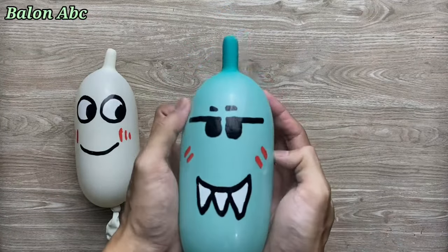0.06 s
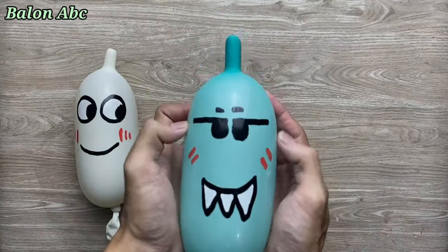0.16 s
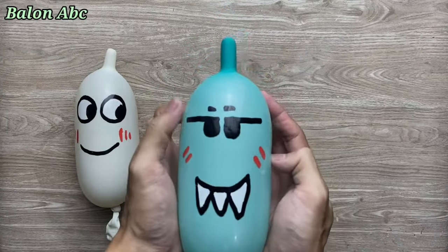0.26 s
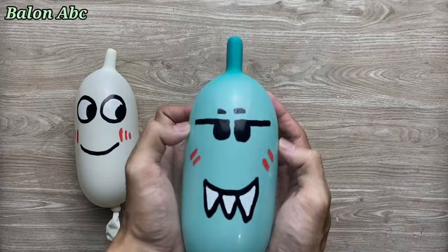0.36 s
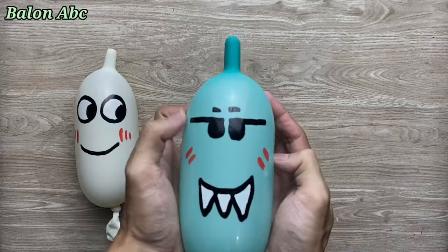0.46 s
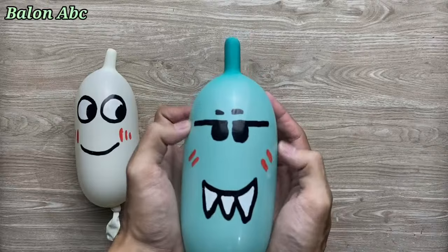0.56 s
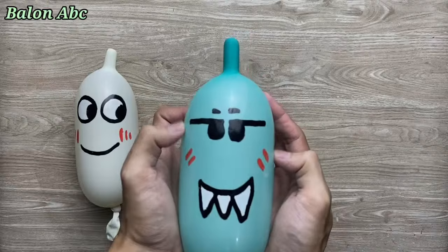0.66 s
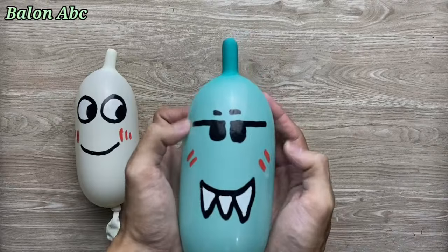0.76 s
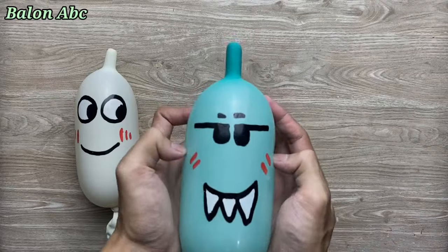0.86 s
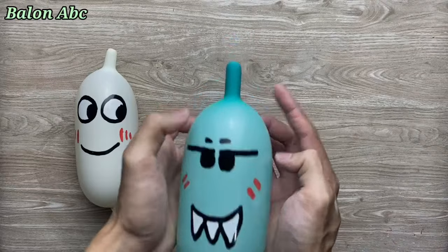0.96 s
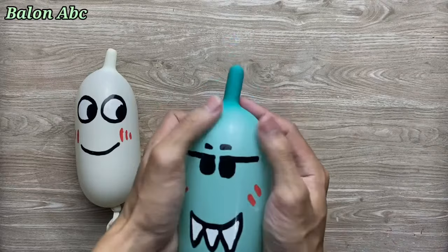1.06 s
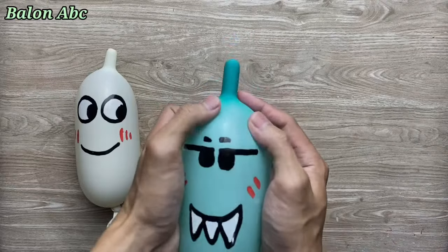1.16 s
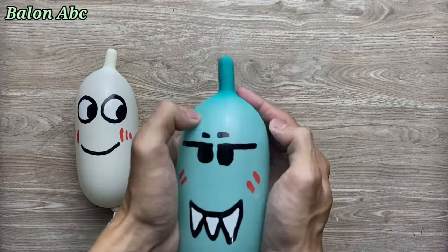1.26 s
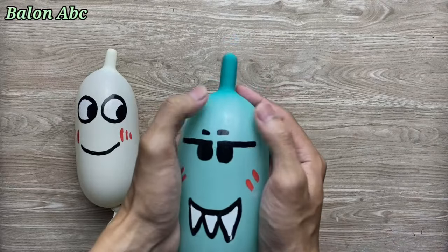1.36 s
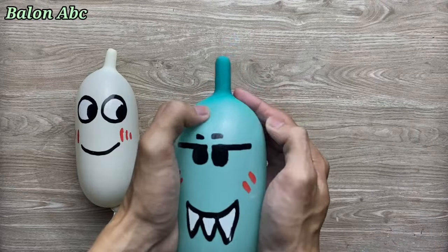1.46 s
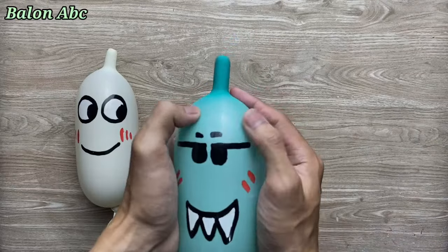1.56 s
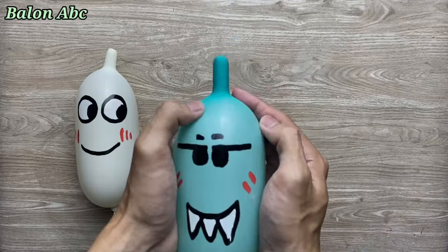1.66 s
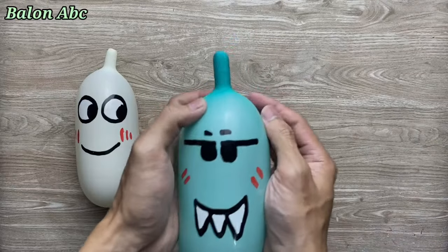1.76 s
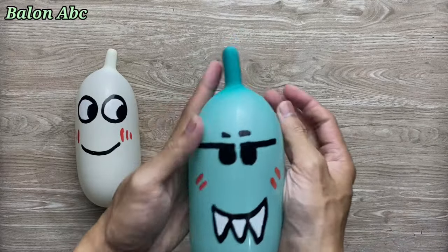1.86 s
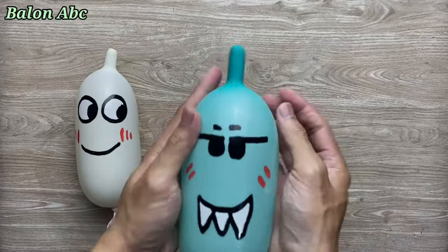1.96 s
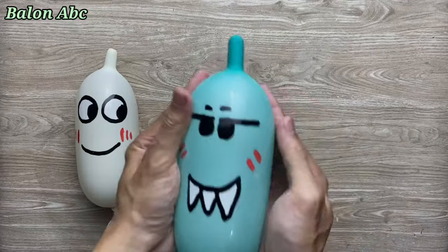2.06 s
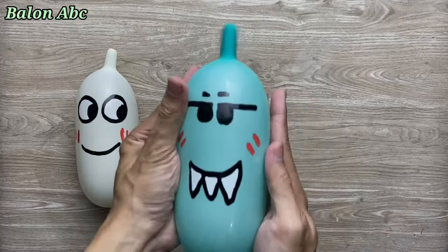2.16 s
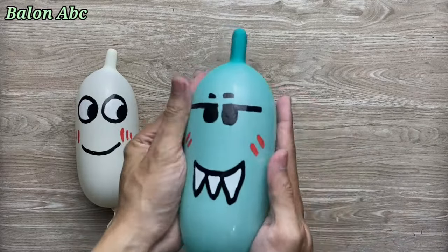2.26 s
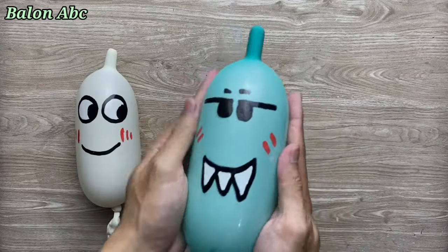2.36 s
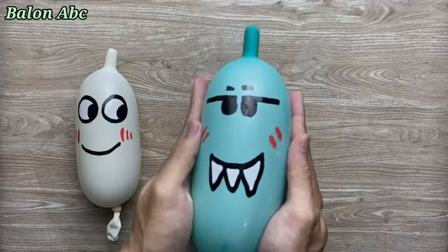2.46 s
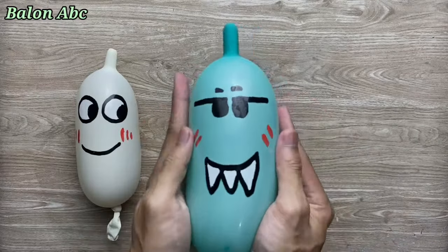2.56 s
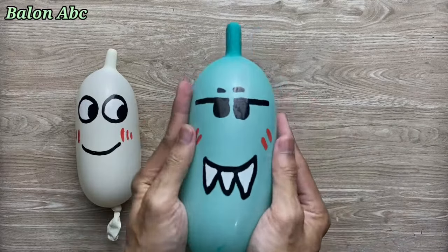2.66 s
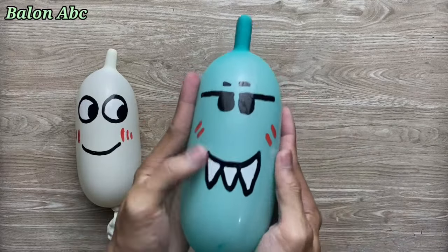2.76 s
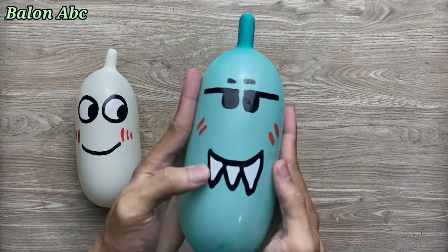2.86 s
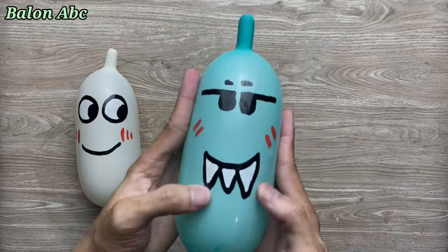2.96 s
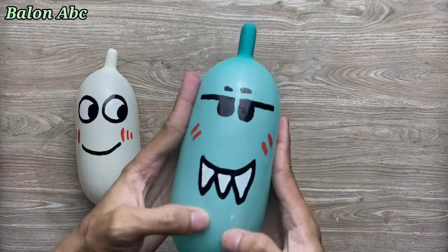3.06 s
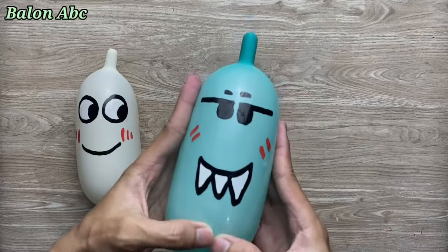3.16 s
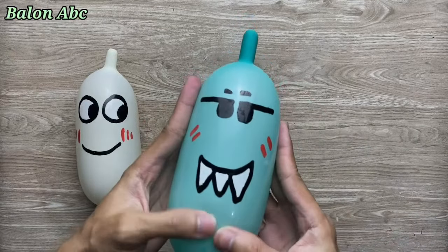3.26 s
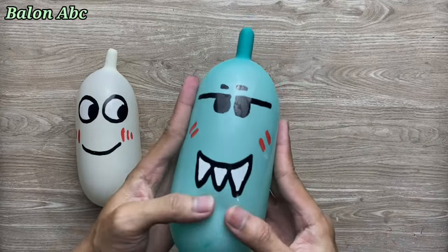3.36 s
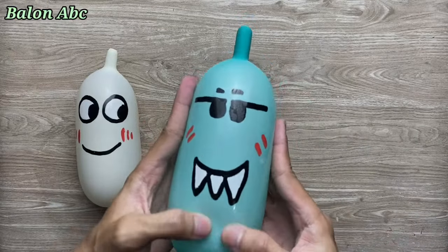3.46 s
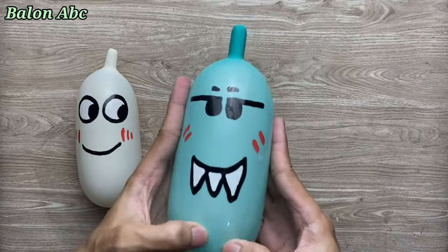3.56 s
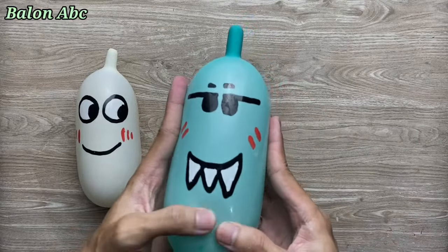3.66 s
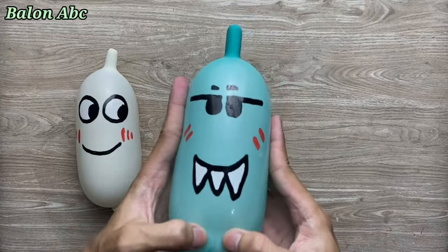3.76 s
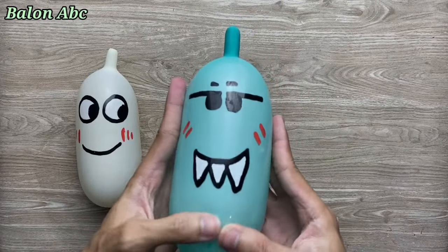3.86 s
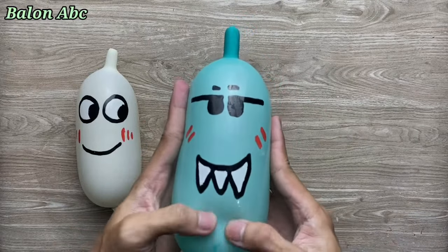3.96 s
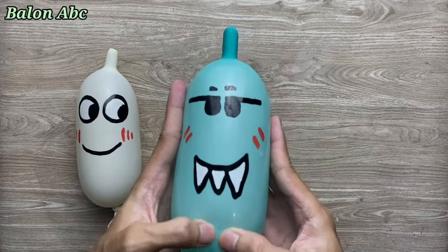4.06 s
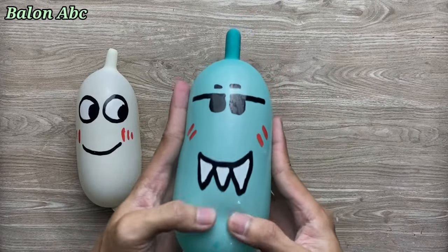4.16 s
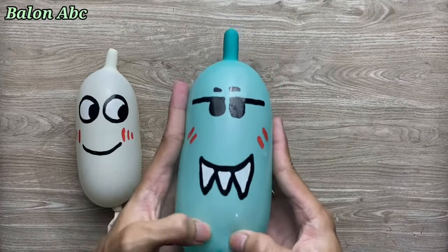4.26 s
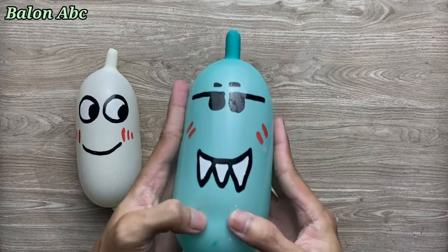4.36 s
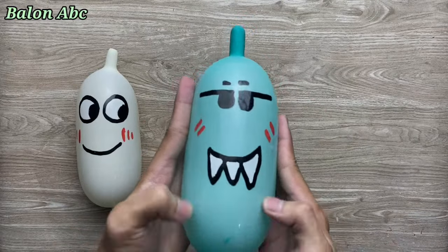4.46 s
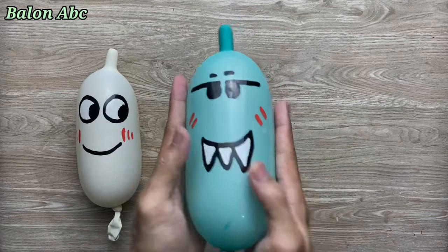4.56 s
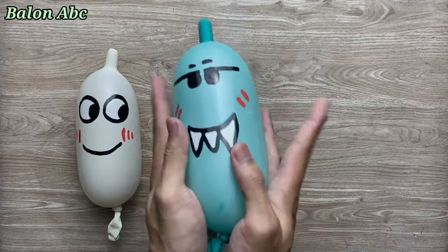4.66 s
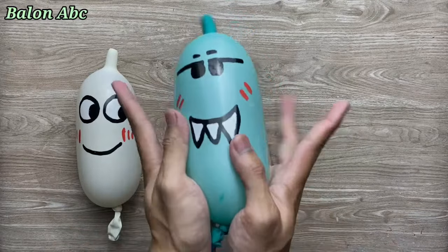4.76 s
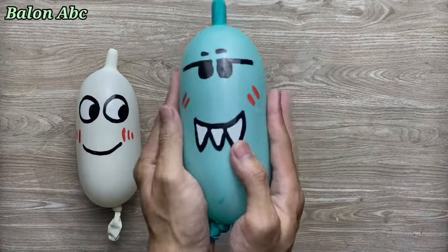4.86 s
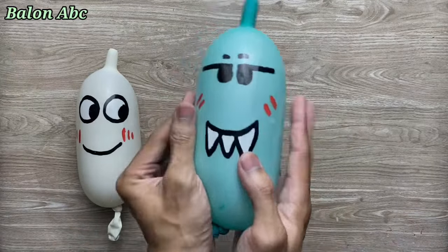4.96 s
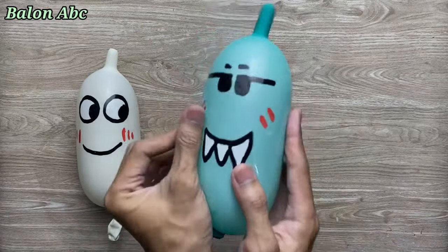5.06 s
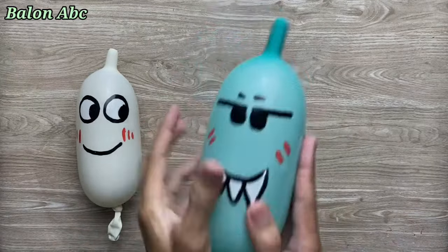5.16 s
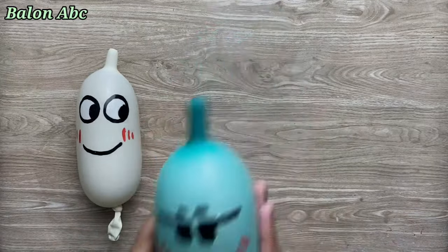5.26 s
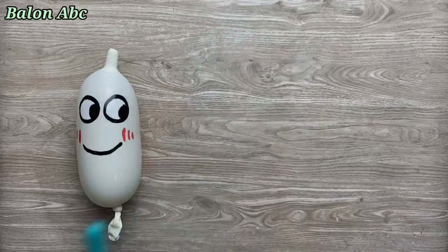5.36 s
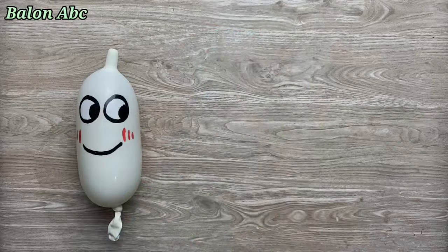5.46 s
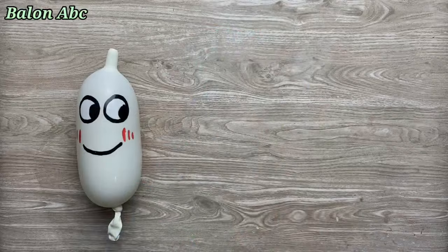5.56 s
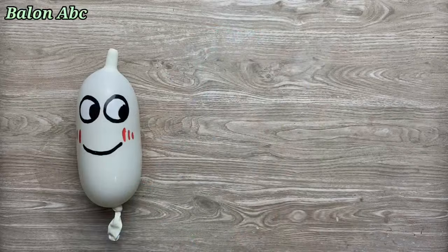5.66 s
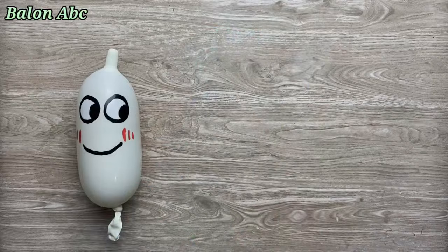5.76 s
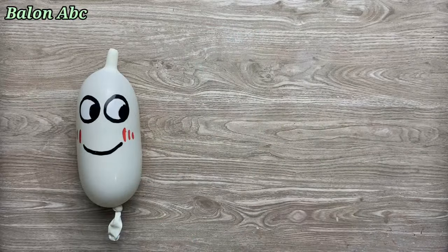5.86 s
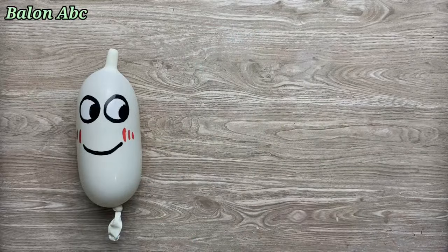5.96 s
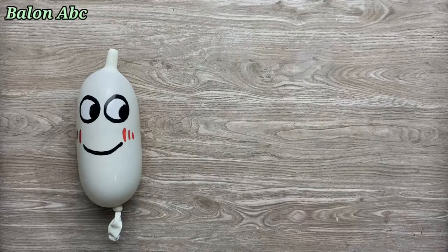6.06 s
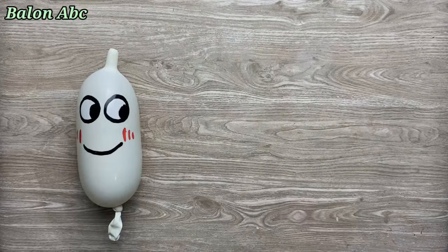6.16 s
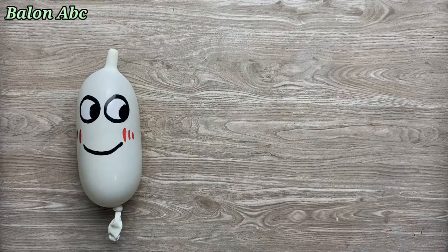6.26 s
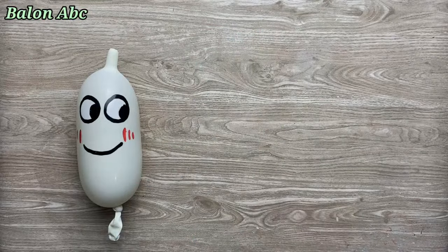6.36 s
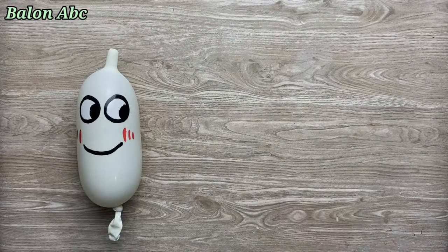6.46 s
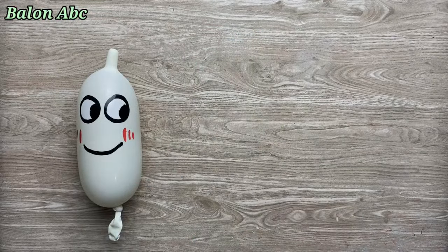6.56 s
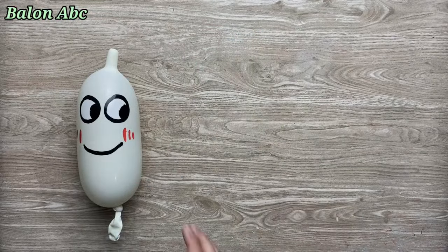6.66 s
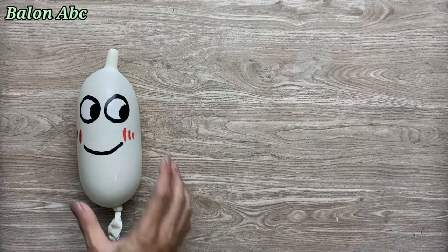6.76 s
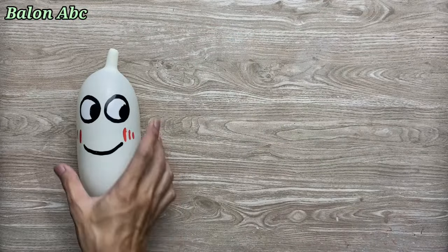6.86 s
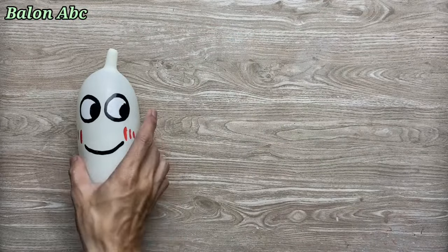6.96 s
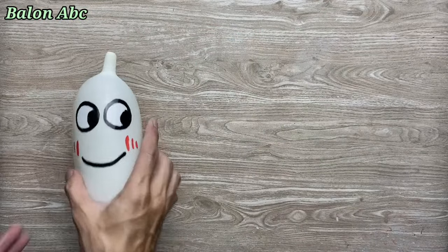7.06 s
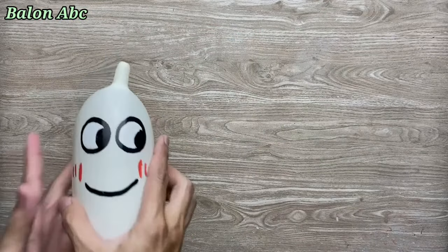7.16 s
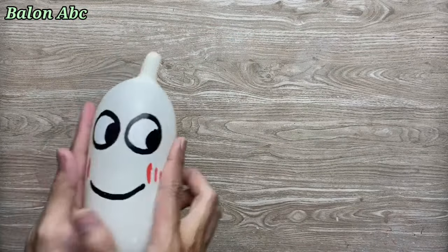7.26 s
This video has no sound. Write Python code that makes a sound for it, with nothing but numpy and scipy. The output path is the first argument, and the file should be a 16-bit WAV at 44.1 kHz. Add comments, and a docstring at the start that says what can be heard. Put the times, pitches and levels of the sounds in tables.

```python
"""A low machine hum fills a small room; at once two hands rub and squeeze a filled latex balloon up close.
Skin sticks and slips on the rubber: uneven slips creak in the balloon's modes, regular ones glide as squeaks.
Snaps, short pings and the grainy hiss of dry skin join in. Then faint rustles and soft thuds on a wooden
table follow as the balloon is put aside and another is picked up.
Creaks are noisy pulse trains through resonators, squeaks gliding harmonics, the rest shaped noise and tones."""
import sys
import numpy as np
from scipy import signal
from scipy.fft import rfft, irfft, next_fast_len
from scipy.io import wavfile
from scipy.ndimage import uniform_filter1d, map_coordinates

SR = 44100
rng = np.random.default_rng(int(sys.argv[2]) if len(sys.argv) > 2 else 0)


def wav_out(sig):
    """Save sig, one row per channel (or a flat mono array), as 16-bit PCM at SR to the path in sys.argv[1]."""
    wavfile.write(sys.argv[1], SR, np.round(np.clip(np.atleast_2d(sig).T, -1, 1) * 32767).astype(np.int16))


N = 322812


def amp(db):
    """Decibels to a linear gain."""
    return 10 ** (np.asarray(db) / 20)


def unit(x):
    """x scaled to rms 1."""
    return x / np.sqrt(np.mean(x ** 2) + 1e-20)


def steady(x, seconds):
    """x levelled towards rms 1 over a sliding window, with its faintest stretches left quiet."""
    window = np.hanning(max(int(seconds * SR), 9))
    power = np.abs(signal.fftconvolve(x ** 2, window / window.sum(), "same"))
    return x / np.sqrt(power + 0.029 * np.mean(x ** 2))


def along(points, hz):
    """Value at hz from (Hz, value) points joined on a log frequency axis."""
    point_hz, values = np.transpose(points)
    return np.interp(np.log(hz + 1), np.log(point_hz + 1), values)


def curves(rows):
    """One value per sample for each column after the time."""
    seconds, *columns = np.transpose(rows)
    return [np.interp(np.arange(N) / SR, seconds, column) for column in columns]


def wobble(rate, size=N):
    """A smooth random curve with rate knots a second."""
    knots = rng.standard_normal(int(size * rate / SR) + 4)
    return map_coordinates(knots, [np.arange(size) * rate / SR])


def filtered(x, response):
    """x shaped by a response that is a function of frequency."""
    padded = next_fast_len(N + 8192)
    spectrum = rfft(x, padded) * response(np.fft.rfftfreq(padded, 1 / SR))
    return irfft(spectrum, padded)[..., :N]


def ring(x, hz, width_hz):
    """One damped resonance with a peak gain of 1."""
    return signal.lfilter(*signal.iirpeak(hz, hz / width_hz, SR), x)


def softened(x, corner_hz):
    """A soft fingertip rounds each release: a gentle low-pass."""
    return signal.sosfilt(signal.butter(2, min(corner_hz, SR / 3), fs=SR, output="sos"), x)


def bursts(events, t60):
    """A short dying puff of noise at each (s, dB)."""
    out, t = np.zeros(N + SR), np.arange(SR // 4) / SR
    for start, db in events:
        out[round(start * SR):][:len(t)] += amp(db - 60 * t / t60) * rng.standard_normal(len(t))
    return out[:N]


# The low hum. Each row: frequency in Hz, mean level in dB.
HUM_TONES = [(48.4, -51), (80.7, -58)]
# A machine's gliding tone. Each row: time in seconds, frequency in Hz, level in dB.
MACHINE_DRONE = [(0, 199.5, -50), (5.2, 203.5, -59), (6, 202.6, -61), (6.3, 197, -51.5),
                 (6.6, 197.8, -48.5), (7.32, 202.3, -55.5)]
# Colour of the room's rumble. Each row: frequency in Hz, relative density in dB per Hz.
RUMBLE_COLOUR = [(25, -35), (45, -3.5), (70, 3), (100, -1.5), (150, -12.5), (300, -19.5), (700, -31.5),
                 (1300, -39.5), (3000, -49), (6000, -65.5), (15000, -64)]


def background():
    """Machine tones over a noise rumble that is nearly mono in the bass."""
    t = np.arange(N) / SR
    hum = np.zeros(N)
    for hz, db in HUM_TONES:
        level = amp(db + wobble(4.1)) * np.sqrt(2)
        hum += level * np.sin(2 * np.pi * hz * t + 1.43 * wobble(2.5))
    drone_hz, drone_db = curves(MACHINE_DRONE)
    drone = amp(drone_db) * np.sqrt(2) * np.sin(2 * np.pi * np.cumsum(drone_hz) / SR)
    mid, side = filtered(rng.standard_normal((2, N)), lambda hz: amp(along(RUMBLE_COLOUR, hz)))
    side = filtered(side, lambda hz: amp(along([(60, -21), (400, -2.0), (2000, -0.5)], hz)))
    rumble = amp(-44) * unit(np.array([mid + side, mid - side]))
    return (hum + drone + rumble) * amp([[-.9], [.9]])  # a touch stronger on the right


LINGER_DB, LINGER_DB_PER_S = -11.5, 107.5  # loose contact that outlasts a stroke


def stroke(start, length, swell_db, attack_s, release_db_per_s):
    """Gain of one stroke: attack, a hold that swells or sags, a release with a lingering tail."""
    gain = np.zeros(N + 2 * SR)
    t = np.arange(int((length + .5) * SR)) / SR
    after = np.maximum(t - length, 0)
    hold = amp(swell_db * (np.minimum(t / length, 1) - .5))
    release = np.maximum(amp(-release_db_per_s * after), amp(LINGER_DB - LINGER_DB_PER_S * after))
    gain[max(round(start * SR), 0):][:len(t)] = np.minimum(t / attack_s, 1) * hold * release
    return gain[:N]


# A finger grips and drags over the rubber. Each row: start in seconds, length in seconds, creak level in dB,
# rasp level in dB, swell from start to end in dB.
FINGER_RUBS = [ (0.016, 0.061, -29, -44, 4.5), (0.118, 0.079, -30, -48.5, -11),
               (0.243, 0.048, -27.5, -39, -4), (0.323, 0.09, -30, -49, -1.5), (0.474, 0.026, -35, -40.5, 2),
               (0.554, 0.1, -30, -48.5, -3.5), (0.764, 0.074, -27, -48.5, 8.5),
               (0.841, 0.037, -21.5, -40, -12.5), (0.908, 0.13, -43.5, -71.5, 2),
               (1.201, 0.07, -34, -55.5, 7), (1.458, 0.014, -28.5, -49, -6.5),
               (1.517, 0.011, -41.5, -57.5, -1.5), (1.637, 0.039, -32, -52, 3.5),
               (1.742, 0.15, -41.5, -57, 7.5), (1.968, 0.17, -32.5, -54, -0.5),
               (2.159, 0.048, -32, -42, -1.5), (2.221, 0.069, -33.5, -52.5, -1),
               (2.364, 0.086, -29.5, -48, 3.5), (2.505, 0.06, -34, -50.5, 7),
               (2.57, 0.085, -27.5, -43.5, -6.5), (2.719, 0.082, -27.5, -39.5, -1),
               (2.79, 0.1, -28, -47, 5), (2.86, 0.084, -30.5, -42.5, 0.5), (2.95, 0.22, -33, -45, -6),
               (3.278, 0.085, -34, -51.5, 6), (3.413, 0.0049, -39.5, -49, -12.5),
               (3.473, 0.056, -24.5, -44, -9), (3.563, 0.058, -40.5, -55.5, 10),
               (3.673, 0.056, -26, -45, 5), (3.835, 0.051, -27.5, -46.5, 0.5),
               (3.973, 0.062, -29, -46.5, -3.5), (4.102, 0.053, -37, -47.5, -6),
               (4.184, 0.037, -24, -39.5, -3), (4.344, 0.038, -34.5, -50, 6.5),
               (4.39, 0.024, -25.5, -42.5, -3), (4.448, 0.02, -28.5, -37.5, -15.5),
               (4.48, 0.13, -49, -66, 5), (4.679, 0.02, -43, -48.5, -22), (4.763, 0.037, -24.5, -44.5, 1),
               (4.843, 0.0078, -21.5, -45.5, -1), (4.88, 0.13, -22.5, -48.5, -5),
               (5.031, 0.032, -26, -40, -11), (5.072, 0.024, -30.5, -50, -6),
               (5.217, 0.029, -32, -51.5, -3.5)]
ATTACK_S, RELEASE_DB_PER_S = 0.0069, 658  # a firm finger takes hold, and lets go
FIRM_DB, EASE_DB_PER_DOUBLING = -17.5, 3.5  # a creak this much below firm takes twice as long to take hold


def pressure():
    """Gains of creak and rasp; light rubs ease in, up to four times slower, and overlaps add in power."""
    creak, rasp = np.zeros(N), np.zeros(N)
    for start, length, creak_db, rasp_db, swell_db in FINGER_RUBS:
        attack_s = ATTACK_S * 2 ** np.clip((FIRM_DB - creak_db) / EASE_DB_PER_DOUBLING, 0, 2)
        early = (attack_s - ATTACK_S) / 2  # a slow attack starts ahead of time
        power = stroke(start - early, length + early, swell_db, attack_s, RELEASE_DB_PER_S) ** 2
        creak += amp(creak_db) ** 2 * power
        rasp += amp(rasp_db) ** 2 * power
    return np.sqrt(creak), np.sqrt(rasp)


def slips(rate, drift, scatter, spread_db):
    """Sample positions and sizes of stick-slip releases, whose rate glides with the finger's speed."""
    cycles = np.cumsum(rate * np.exp(drift * wobble(28))) / SR
    marks = np.cumsum(np.exp(scatter * rng.standard_normal(int(cycles[-1]) * 2)))
    when = np.searchsorted(cycles, marks[marks < cycles[-1]])
    return when, amp(spread_db * rng.standard_normal(len(when)))


def struck(when, size, modes, variety, wander_db=0):
    """Each slip drives the modes in new shares, and the shares drift as the contact wanders."""
    shares = 1 + variety * rng.standard_normal((len(modes), len(when)))
    shares = shares * amp(wander_db * np.array([wobble(16)[when] for _ in modes]))
    out = np.zeros(N)
    for k, (hz, width_hz, db) in enumerate(modes):
        pulses = np.bincount(when, size * shares[k], N)
        out += (-1) ** k * amp(db) * ring(pulses, hz, width_hz)  # neighbours in opposite polarity
    return out


BEND_PERCENT, BEND_PER_S = 6, 22  # how far and how often the fingers' pull bends the body modes


def stretched(x, percent):
    """Stretching the rubber bends its ringing up and down in pitch."""
    rate = percent / 100 * wobble(BEND_PER_S)
    ahead = np.cumsum(rate - uniform_filter1d(rate, SR // 5))
    return map_coordinates(x, [np.arange(N) + ahead])


# Skin on latex. Each row: frequency in Hz, gain in dB.
SKIN_COLOUR = [(500, -24.5), (1200, 8.5), (2500, 3.5), (4000, 1), (6000, -7), (10000, -13), (15000, -28.5)]


def skin(x):
    """The bright colour of skin on latex."""
    return filtered(x, lambda hz: amp(along(SKIN_COLOUR, hz)))


# How fast the fingers travel. Each row: time in seconds, stick-slip releases per second before random drift.
SLIP_RATES = [(0, 230), (.25, 260), (.35, 100), (.62, 135), (.85, 270), (2.4, 230), (2.52, 125),
              (2.75, 330), (3.15, 300), (3.7, 210), (4.2, 270), (4.9, 230)]
# The balloon, six body modes and then three upper ones. Each row: frequency in Hz, width in Hz,
# relative level in dB.
BALLOON_MODES = [(355.6, 33, -1), (441, 78, -6), (595, 66, -5.5), (721.4, 66, 3.5), (774.4, 80, 6),
                 (880, 43, 1), (1056, 140, -8), (1057, 250, -10.5), (1533.6, 45, -7.5)]
# The whole wall giving way. Each row: frequency in Hz, width in Hz, relative level in dB.
WALL_MODES = [(182, 83, 0.5), (240, 140, -4.5)]
# Modes rung by the rasp. Each row: frequency in Hz, width in Hz, relative level in dB before it wanders.
SINGING_MODES = [(2080, 280, -2.5), (2615, 71, 9), (3192, 27, 14.5), (3334, 440, -15)]
# The grip. Each row: time in seconds, wall flexing in dB relative to the creak, tautness as dB on the
# balloon's upper modes, dB on the singing modes.
GRIP_CURVE = [(0, -10, 3.5, -1), (.9, -15, 3, -2), (1.25, -4.5, 7, 0), (1.55, -3.5, 9.5, -1.5),
              (1.9, -15, 3.5, 0.5), (2.1, -3.5, 2, 0), (2.45, -9, 3, -4.5), (2.8, -19, -3.5, 1),
              (3.05, -10.5, 7, 0.5), (3.3, -9.5, 3, -1), (3.7, -11, 1.5, -1.5), (4.25, -9.5, 5.5, -2),
              (4.8, -12, 0, 2), (5, -20, -17.5, -2), (5.3, -6.5, -0.5, 3)]


def rubbing():
    """Slips ring the balloon and flex its wall; each also lets go a rasping puff."""
    creak_gain, rasp_gain = pressure()
    flex_db, taut_db, sing_db = curves(GRIP_CURVE)
    when, size = slips(rate=curves(SLIP_RATES)[0], drift=.25, scatter=.2, spread_db=2.4)

    body = struck(when, size, BALLOON_MODES[:6], variety=0.45, wander_db=3)
    upper = struck(when, size, BALLOON_MODES[6:], variety=0.33)
    body = softened(stretched(body, BEND_PERCENT), corner_hz=1350)
    creak = steady(softened(body + amp(taut_db) * upper, corner_hz=2070), seconds=.025)
    flex = softened(struck(when, size, WALL_MODES, variety=0.68), corner_hz=433)
    flex = steady(flex, seconds=0.26)

    # each release puffs noise that dies in 3.7 ms; the power below 1 evens out firm and light ones
    puff_decay = np.exp(-1 / (0.0037 * SR))
    puffs = signal.lfilter([1], [1, -puff_decay], np.bincount(when, size ** 0.62, N))
    grit = (unit(puffs) + 0.35) * rng.standard_normal(N)
    # the high modes come and go as the contact wanders, and sing mainly under a firm grip
    singing = np.zeros(N)
    for hz, width_hz, db in SINGING_MODES:
        singing += amp(db + 6.7 * wobble(12)) * ring(grit, hz, width_hz)
    singing = unit(softened(singing, corner_hz=5440))
    firmness = amp(sing_db) * (rasp_gain / amp(-39.5)) ** 0.36
    rasp = steady(unit(skin(grit)) + firmness * singing, seconds=0.078)

    judder = amp(2.49 * wobble(70))  # the finger drags unevenly
    return judder * (creak_gain * (creak + amp(flex_db) * flex) + rasp_gain * rasp)


# Skin tearing loose with a snap. Each row: time in seconds, push on the balloon's modes in dB,
# crack level in dB before the skin's colour.
SKIN_SNAPS = [(.017, 14.5, -56), (0.022, 18.5, -47), (.123, 10, -29), (.344, 9, -31), (.360, 13.5, -50),
              (0.386, 16, -45.5), (.409, 7, -53), (.585, 18, -52), (.611, 10, -54), (.622, 16.5, -46.5),
              (.630, 14.5, -50), (1.470, 11.5, -50), (1.521, 6, -45), (1.671, 17.5, -33.5),
              (1.956, -17, -35), (2.502, 18, -44), (2.521, 10.5, -52), (2.536, 13, -42), (2.545, 16, -44),
              (2.554, 15, -42), (2.583, 15, -32), (2.643, 10, -50), (3.405, 11, -34.5), (3.685, 15.5, -40),
              (3.712, 13, -36), (3.967, 16, -29), (4.023, 6, -34), (4.311, 9.5, -38.5), (4.445, 7, -29.5),
              (4.460, 15.5, -32), (4.683, 0.5, -40), (4.763, 14, -36), (4.797, 19.5, -22.5),
              (5.051, 18.5, -25.5), (7.214, -2.5, -44)]


def snaps():
    """Each snap rings the balloon's modes and cracks with a short burst of noise."""
    seconds, push_db, crack_db = np.transpose(SKIN_SNAPS)
    when = (seconds * SR).astype(int)
    body = softened(struck(when, amp(push_db), BALLOON_MODES, variety=0.35), corner_hz=2190)
    return body + skin(bursts(zip(seconds, crack_db), t60=0.013))


# Regular slipping. Each row: start in seconds, length in seconds, start, middle and end pitch in Hz,
# tone level in dB before softening and mix, roughness (held to 0-1).
SQUEAK_GLIDES = [ (0.028, 0.035, 380, 750, 1300, -28.5, 0.65), (0.243, 0.014, 333, 500, 950, -25, 0.4),
                 (0.251, 0.029, 1200, 1700, 800, -28.5, .3), (0.448, 0.025, 1620, 1860, 2280, -32, 0.12),
                 (0.468, 0.025, 2230, 1820, 850, -33, 0.35), (.656, 0.028, 1000, 1450, 1650, -32, 0.38),
                 (0.677, 0.01, 1574, 1570, 1650, -24.5, 0), (0.684, 0.02, 1760, 1420, 750, -32.5, .42),
                 (0.849, 0.019, 688, 801, 778, -16, 0.14), (1.26, 0.02, 322, 174.5, 139.6, -24.5, 0.4),
                 (1.467, 0.018, 266, 183, 146.6, -26.5, 0.47), (1.472, 0.013, 1650, 1510, 1460, -41.5, 0.1),
                 (1.529, 0.019, 281.4, 200, 159, -28, 0.01), (1.676, 0.018, 1580, 1468, 1510, -34.5, 0),
                 (1.698, 0.028, 750, 770, 790, -35, 0.3), (1.868, 0.029, 1494, 1000, 248, -41, 0.6),
                 (2.16, 0.025, 720, 854, 900, -28, 0.55), (2.236, 0.06, 600, 680, 1000, -33, 0.85),
                 (2.366, .042, 854, 619, 460, -29, .35), (2.743, 0.051, 400, 765, 857, -28, 0.55),
                 (2.872, 0.065, 830, 740, 400, -29.5, 0.5), (3.473, 0.026, 795, 739, 758, -22.5, 0),
                 (3.515, 0.04, 711, 379.6, 187, -31, 0.45), (3.968, 0.025, 883, 801, 731, -22, 0.43),
                 (4.181, 0.045, 866, 792, 503, -26, 0.63), (4.226, 0.03, 436, 308, 219, -27, 0.55),
                 (4.397, 0.028, 400, 700, 1600, -28.5, 0.9), (4.446, 0.0092, 767, 794, 804, -22.5, 0.2),
                 (4.452, 0.019, 1135, 1574, 1720, -32.5, 0.5), (5.125, 0.018, 746, 1384, 2300, -35.5, 1.1)]
# Smooth squeaks. Each row: pitch in Hz, step from each overtone to the next in dB.
OVERTONE_STEPS = [(800, -17), (1500, -11)]
BITE_DB = 6  # rough squeaks release more sharply: at full roughness each overtone step falls this much less
GRIT_DB, BREAK_UP = -14, .6  # rasp of a fully rough squeak; growth of roughness from its middle to its end


def squeaks():
    """Under even pressure slips lock into a pitch that follows the finger's speed; rough ones turn raspy."""
    tones, grit = np.zeros(N + SR), np.zeros(N + SR)
    for start, length, start_hz, middle_hz, end_hz, db, rough in SQUEAK_GLIDES:
        u = np.linspace(0, 1, max(int(length * SR), 64))
        size = len(u)
        rough = np.clip(rough, 0, 1)
        loose = rough * (1 + BREAK_UP * (2 * u - 1))
        # a parabola in log pitch through the three pitches
        glide = np.polyfit([0, .5, 1], np.log([start_hz, middle_hz, end_hz]), 2)
        pitch = np.exp(np.polyval(glide, u))
        jitter = .17 * loose * wobble(900, size) + .02 * wobble(220, size)
        phase = 2 * np.pi * np.cumsum(pitch * (1 + jitter)) / SR

        slope_db = along(OVERTONE_STEPS, middle_hz) + BITE_DB * rough
        tone = np.sin(phase)
        for k in range(2, 8):
            tone += amp(slope_db * (k - 1) + 3 * wobble(200, size)) * np.sin(k * phase)
        swell = np.abs(np.sin(np.pi * u)) ** .5 * amp(4 * loose * wobble(450, size))
        # one puff of noise per slip
        puffs = unit((1 + np.cos(phase)) ** 2 * rng.standard_normal(size))

        tones[round(start * SR):][:size] += amp(db) * unit(tone * swell)
        grit[round(start * SR):][:size] += amp(db + GRIT_DB) * loose * puffs * unit(swell)
    direct = softened(tones[:N], corner_hz=4100) + skin(grit[:N])
    # the balloon rings on wherever a glide crosses one of its modes
    echo = sum(ring(direct, hz, width_hz) for hz, width_hz, _ in BALLOON_MODES)
    return 0.75 * direct + 0.3 * echo


# A finger lets go and the taut skin rings on. Each row: time in seconds, level in dB before the attack.
SKIN_PINGS = [(.126, -42), (2.788, -37), (4.418, -42), (4.464, -33), (4.797, -39), (5.052, -35)]
PING_HZ, PING_T60_S = 3170, .16  # the skin's highest clear mode


def pings():
    """The freed skin rings briefly: a decaying sine with a soft onset and an unsteady phase."""
    out, t = np.zeros(N + SR), np.arange(SR // 4) / SR
    for start, db in SKIN_PINGS:
        phase = 2 * np.pi * PING_HZ * t + 0.37 * wobble(130, len(t))
        envelope = amp(db - 60 * t / PING_T60_S) * (1 - np.exp(-t / 0.0038))
        out[round(start * SR):][:len(t)] += envelope * np.sin(phase)
    return out[:N]


# Dry skin sliding lightly. Each row: start in seconds, length in seconds, level in dB.
DRY_STROKES = [(0.468, 0.025, -55), (0.655, 0.027, -46.5), (0.83, 0.14, -52), (1.826, 0.024, -52),
               (2.053, 0.086, -51), (2.14, 0.058, -56.5), (2.32, .12, -51), (2.532, 0.085, -55),
               (4.389, 0.067, -47.5), (4.767, 0.087, -49.5), (4.976, 0.095, -53.5), (5.126, 0.014, -49.5),
               (5.21, 0.082, -61), (7.2, 0.028, -59), (7.287, 0.028, -59)]
# Colour of the slide. Each row: frequency in Hz, relative density in dB per Hz.
SLIDE_COLOUR = [(800, -4), (2500, 10.5), (5000, 0.5), (10000, 1), (15000, -10)]
BRUSH_ATTACK_S, BRUSH_RELEASE_DB_PER_S = 0.016, 329


def brushing():
    """Light strokes of dry skin make a grainy hiss: coloured noise with a fast random flicker."""
    power = np.zeros(N)
    for start, length, db in DRY_STROKES:
        power += (amp(db) * stroke(start, length, 0, BRUSH_ATTACK_S, BRUSH_RELEASE_DB_PER_S)) ** 2
    slide = unit(filtered(rng.standard_normal(N), lambda hz: amp(along(SLIDE_COLOUR, hz))))
    grain = unit(amp(2.3 * wobble(500) + 3.7 * wobble(65)))
    return np.sqrt(power) * grain * slide


# Hands and balloon sweep past the table. Each row: middle in seconds, half length in seconds, level in dB.
SWEEPS = [(5.605, .03, -62.5), (5.975, .03, -63)]
# Colour of the rustle. Each row: frequency in Hz, relative density in dB per Hz.
RUSTLE_COLOUR = [(1000, -12), (2500, 1.5), (3800, 0), (5500, -9), (10000, -6.5), (15000, -23)]


def swishes():
    """A grainy rustle that swells and fades: flickering noise under bell-shaped gains."""
    t = np.arange(N) / SR
    gain = sum(amp(db) * np.exp(-.5 * ((t - middle) / half) ** 2) for middle, half, db in SWEEPS)
    crackle = rng.standard_normal(N) * amp(4.5 * wobble(600) + 1.5 * wobble(70))
    return gain * unit(filtered(crackle, lambda hz: amp(along(RUSTLE_COLOUR, hz))))


# Soft bumps of a balloon on the table. Each row: time in seconds, strength in dB before the thud's colour.
TABLE_BUMPS = [(6.091, -29.5), (6.125, -36.5), (6.165, -41.5), (6.225, -42), (6.938, -34.5), (7.212, -31.5)]
# Colour of a bump. Each row: frequency in Hz, gain in dB.
THUD_COLOUR = [(100, -7.5), (300, -0.5), (520, -3), (660, 7), (1000, -4.5), (1800, -13), (3200, -19.5),
               (4500, -37.5), (10000, -43)]


def bumps():
    """A balloon meets the table with a dull thud: a noise burst stripped of its treble."""
    blows = bursts(TABLE_BUMPS, t60=0.14)
    return filtered(blows, lambda hz: amp(along(THUD_COLOUR, hz)))


# The small room. Each row: frequency in Hz, time to decay by 60 dB in seconds.
ROOM_DECAY = [(150, 0.31), (800, 0.28), (3000, 0.24), (12000, 0.18)]


def room(x):
    """The room's tail, different at each port: noise that decays at its own pace in each band."""
    hz, t, bands = signal.stft(rng.standard_normal((2, SR // 2)), SR, nperseg=256)
    decay = amp(-60 * t / along(ROOM_DECAY, hz)[:, None])
    tail = signal.istft(bands * decay, SR, nperseg=256)[1]
    tail = np.pad(tail / np.linalg.norm(tail[0]), ((0, 0), (int(.004 * SR), 0)))  # starts 4 ms late
    return signal.fftconvolve(x[None], tail, axes=1)[:, :N]


# Both tables are scaled by the share each port takes, below.
# Each row: frequency in Hz, unscaled lead of the left port in radians.
PORT_LEAD = [(100, 0.5), (400, 0.4), (1000, 0.9), (2000, 2), (3300, 2.5), (6700, 1.26), (8400, -5.5),
             (10000, -9.5), (12200, -16), (14000, -18.5)]
# Each row: frequency in Hz, unscaled left over right level in dB.
PORT_LEVEL = [(200, -1.5), (600, 0.5), (1200, 3), (5000, 7.5), (9000, 0)]


def placed(x):
    """The microphone's two ports hear x with their own phase and level at each frequency."""
    def port(share):
        def response(hz):
            level = amp(share * along(PORT_LEVEL, hz) / 2)
            return level * np.exp(.5j * share * along(PORT_LEAD, hz))
        return filtered(x, response)
    return np.array([port(0.65), port(-0.61)])


def scene():
    """Hands and balloon close to the microphone, the table's thuds wetter, the hum behind."""
    behind = background()
    hands = rubbing() + snaps() + squeaks() + pings() + brushing() + swishes()
    table = bumps()
    sway = amp(np.outer([1, -1], .4 * wobble(5)))  # the contact wanders from side to side
    near = sway * placed(hands + table)
    return near + amp(-10) * room(hands) + amp(-3.5) * room(table) + behind


TOP_HZ = 15500


def record(dry):
    """The recorder keeps nothing above its band limit."""
    return filtered(dry, lambda hz: hz < TOP_HZ)


dry = scene()
out = record(dry)
wav_out(out)
```